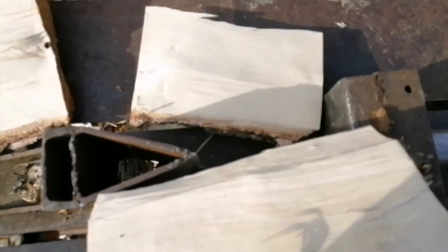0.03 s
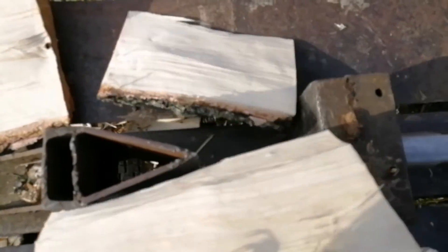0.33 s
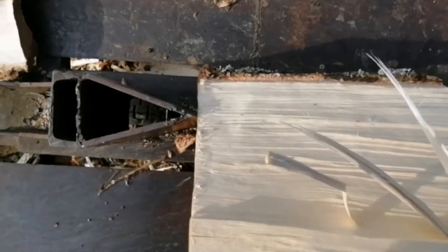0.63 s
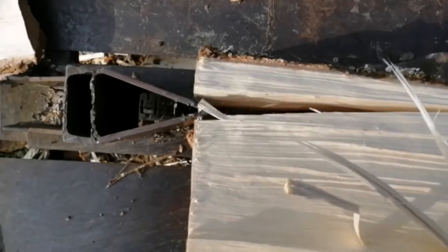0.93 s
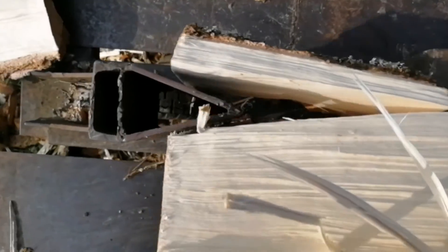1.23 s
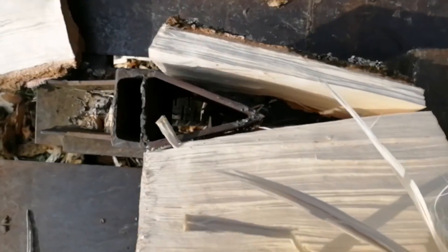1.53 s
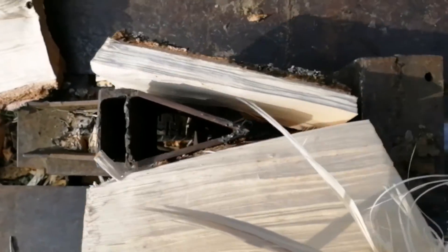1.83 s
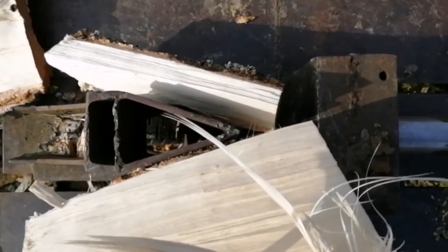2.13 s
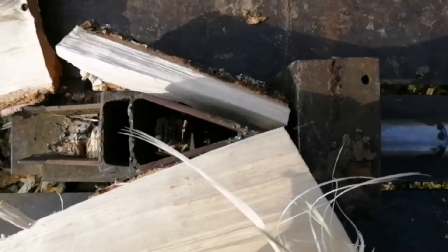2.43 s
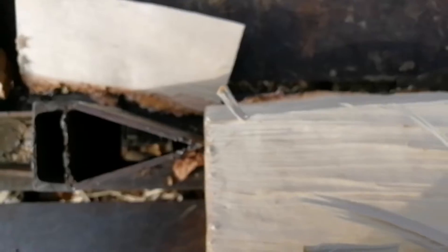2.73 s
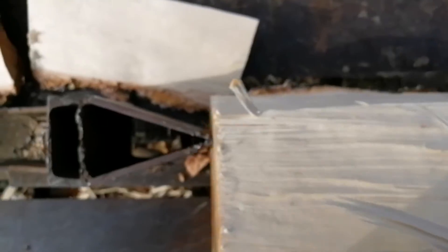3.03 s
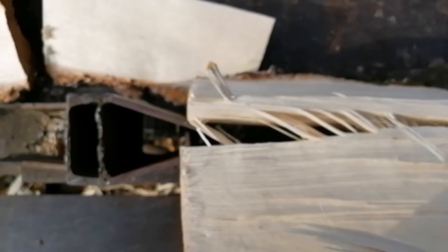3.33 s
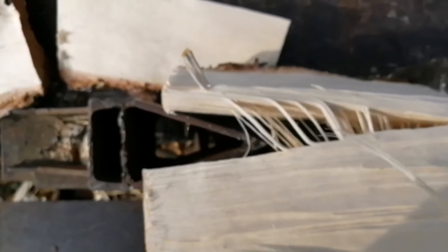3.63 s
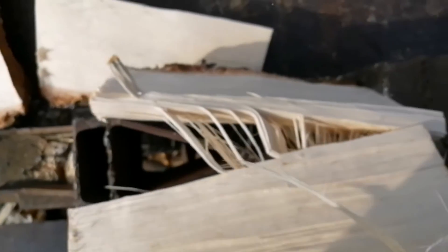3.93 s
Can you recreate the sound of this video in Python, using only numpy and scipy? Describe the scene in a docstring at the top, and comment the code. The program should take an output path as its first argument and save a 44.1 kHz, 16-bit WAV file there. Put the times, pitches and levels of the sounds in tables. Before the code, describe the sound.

Close to the wedge of an outdoor log splitter, a block tears with a rising crackle and cracks. The halves scrape along steel, then another split cracks harder, over a throbbing engine, a humming pump and light wind.

```python
"""Outdoors at a hydraulic log splitter, the microphone just above the wedge. The one-cylinder engine
throbs through its muffler and labours twice as the ram drives a block onto the steel; the pump hums
under the pressure. Close up the wood squeaks, its fibres tear in a rising crackle, and it cracks open.
The halves scrape past, last splinters snap, and light wind buffets the microphone."""
import sys
import numpy as np
from scipy import signal
from scipy.fft import rfft, irfft, next_fast_len
from scipy.io import wavfile
from scipy.ndimage import map_coordinates

SR = 44100
rng = np.random.default_rng(int(sys.argv[2]) if len(sys.argv) > 2 else 0)


def pcm_store(signal):
    """Save signal as 16-bit PCM."""
    levels = np.round(np.clip(np.atleast_2d(signal), -1, 1) * 32767)
    wavfile.write(sys.argv[1], SR, levels.astype(np.int16).T)


N = 176400

# speed of the engine, which also turns the pump: t/s, firing rate/Hz
FIRING_RATE = [(0, 35.2), (.5, 35.2), (.72, 34.8), (.95, 33.1), (1.2, 33.3), (1.38, 35), (1.9, 34.9),
               (2.45, 34.6), (2.7, 33.5), (3, 33.1), (3.18, 32.5), (3.45, 35), (3.75, 35), (4, 34.3)]


def amp(db):
    return 10 ** (np.asarray(db) / 20)


def unit(x):
    return x / np.sqrt(np.mean(x ** 2) + 1e-20)


def curve(rows):
    """(t/s, value) points as one value per sample."""
    return np.interp(np.arange(N) / SR, *np.transpose(rows))


def swells(rows):
    """Summed envelopes, each with attack, hold and release."""
    t = np.arange(N) / SR
    return sum(amp(db) * np.interp(t, np.sort(times), [0, 1, 1, 0]) for *times, db in rows)


def wobble(per_s):
    """A smooth random curve with per_s knots a second."""
    return map_coordinates(rng.standard_normal(1000), [np.arange(N) * per_s / SR], mode="wrap")


def resonance(f, hz, width):
    """Response at f of one mode centred on hz."""
    return 1j * f * width / (hz * hz - f * f + 1j * f * width)


def filtered(x, response):
    """x with its spectrum multiplied by response(f)."""
    size = 2 * next_fast_len((N + SR // 2) // 2)
    return irfft(rfft(x, size) * response(np.fft.rfftfreq(size, 1 / SR)), size)[:N]


def coloured(x, points):
    """x through a causal filter shaped by (f/Hz, level/dB) points, at rms 1."""
    def response(hz):
        f, db = np.transpose(points)
        gain = amp(np.interp(np.log(hz + 1), np.log(f + 1), db))
        cepstrum = irfft(np.log(gain))
        half = len(cepstrum) // 2
        cepstrum[1:half] *= 2  # fold to minimum phase
        cepstrum[half + 1:] = 0
        return np.exp(rfft(cepstrum))
    return unit(filtered(x, response))


def grains(per_s, spread_db):
    """Random tiny slips or snaps of uneven size."""
    sizes = amp(spread_db * np.minimum(rng.exponential(size=N), 4))
    return (rng.random(N) < per_s / SR) * sizes * rng.choice([-1, 1], N)


def burst(envelope, band_hz):
    """Noise under an envelope, kept to a band, with the envelope's energy."""
    bandpass = signal.butter(2, band_hz, "band", fs=SR, output="sos")
    x = signal.sosfilt(bandpass, envelope * rng.standard_normal(len(envelope)))
    return x * np.linalg.norm(envelope) / np.linalg.norm(x)


def steel_frame(x, t60_s=0.044, wet=0.74, width_hz=10):
    """The splitter's frame adds a short dense ring and its main modes; the result is at rms 1."""
    # frame modes: f/Hz, level/dB relative to the direct sound
    modes = [(712, 8), (1195, 0), (1335, -5), (1873, -6), (2643, 0.5), (3290, 3), (4732, -10.5),
             (5168, 2.5), (5760, -8), (5880, -4.5)]
    t = np.arange(SR // 8) / SR
    tail = rng.standard_normal(len(t)) * amp(-60 * t / t60_s)
    x = x + wet * signal.fftconvolve(x, tail / np.linalg.norm(tail))[:N]
    return unit(filtered(x, lambda f: 1 + sum(amp(db) * resonance(f, hz, width_hz) for hz, db in modes)))


def engine():
    """Firings drone through the muffler; gas and clatter swell once a cycle. Load makes it all louder."""
    # how hard the engine works: t/s, level/dB
    effort = [(0.0, -36.5), (0.08, -39.5), (0.17, -49.5), (0.31, -39), (0.41, -34), (0.44, -25.5),
              (0.63, -23), (0.73, -27.5), (0.91, -26.5), (1.05, -40.5), (1.43, -36), (1.63, -37),
              (2.47, -32), (2.55, -33.5), (2.71, -32), (2.74, -22), (3.07, -25.5), (3.29, -47.5),
              (3.34, -35.5), (3.51, -36.5), (3.95, -32), (4.0, -31.5)]
    # colour of the gas leaving the muffler: f/Hz, level/dB
    muffler = [(30, -55), (100, -32), (190, -7), (255, -6), (305, 3), (350, 1), (390, 2), (440, -7.5),
               (530, -11), (680, -36.5), (1500, -50)]
    # colour of the clatter: f/Hz, level/dB
    clatter_colour = [(350, -9), (520, -3.5), (620, -9.5), (711, -10.5), (945, -11.5), (1170, -11.5),
                      (1270, -14.5), (1670, -11.5), (2420, -22), (3810, -28), (5180, -21.5), (6890, -27.5),
                      (7500, -50.5), (9750, -84.5), (16500, -120)]
    # exhaust note: t/s, then level/dB of harmonics 9, 10 and 11, relative to the effort
    harmonics = [(.3, -12, -4, -13), (.47, -14, -1.5, -16), (.68, -13, -1.5, -14), (.82, -11, -7, -6),
                 (1.25, -6, -8, -10), (1.45, -7, -2.5, -12), (1.85, -7, -2.5, -12), (2.05, -4, -10, -8),
                 (2.42, -5, -9, -9), (2.62, -14, -6, -12), (2.76, -3, -15, -14), (3.1, -7, -12, -10),
                 (3.4, -13, -3, -11), (4, -12, -3, -9)]
    cycles, effort_db = np.cumsum(curve(FIRING_RATE)) / SR, curve(effort)
    throb = np.cos(2 * np.pi * cycles)
    gas = coloured(rng.standard_normal(N) * (1 + 0.15 * throb), muffler)
    drone = np.zeros(N)
    for column, order in enumerate((9, 10, 11), 1):
        level = amp(curve(np.array(harmonics)[:, [0, column]]))
        phase = 2 * np.pi * (order * cycles + rng.random()) + 0.26 * wobble(40)
        drone += np.sqrt(2) * level * np.sin(phase)
    clatter = steel_frame(coloured(rng.standard_normal(N) * (1 + 0.21 * throb), clatter_colour))
    clatter_db = -42.5 + 0.64 * (effort_db - np.median(effort_db))  # swings less than the exhaust
    return amp(effort_db) * (amp(-4.2) * gas + drone) + amp(clatter_db) * clatter


def cracks(rise_s=0.0005, snap_t60_s=0.0037):
    """A bundle of fibres breaks: a sharp snap, then a burst that rings the splinter and dies quickly."""
    # breaks: t/s, level/dB of thump, body, ring and top, ring f/Hz, t60/s, snap level/dB
    breaks = [(0.439, -29, -43, -38, -36, 3300, 0.052, -37.5),
              (0.7053, -34, -28.5, -23.5, -21, 2000, 0.034, -33),
              (0.937, -56, -43, -20, -20, 2680, 0.02, -25), (0.9772, -43, -17, -19.5, -14, 870, 0.011, -18),
              (1.09, -36, -25, -25, -33.5, 1340, 0.016, -33),
              (2.7285, -27, -31.5, -39, -36, 2440, 0.04, -33),
              (2.842, -53, -20.5, -22, -41.5, 766, 0.042, -36),
              (2.851, -49, -44, -23, -28, 1980, 0.041, -31),
              (3.096, -27.5, -21.5, -42, -23.5, 2380, 0.033, -26),
              (3.134, -39, -15.5, -21.5, -20, 1863, 0.019, -27),
              (3.153, -42, -13.5, -23, -30.5, 1380, 0.024, -25),
              (3.2281, -51, -31, -37, -28.5, 3150, 0.033, -26),
              (3.245, -14.5, -16, -19, -13.5, 2370, 0.011, -15),
              (3.3129, -60, -36, -41, -46, 3080, 0.011, -35),
              (3.36, -66, -52, -42, -35.5, 2880, 0.018, -44),
              (3.5418, -63.5, -49, -29, -22.5, 2410, 0.015, -17)]
    thump_hz, body_hz, top_hz, snap_hz = (22, 190), (470, 1540), (4930, 6020), (2660, 10800)
    out, t = np.zeros(N + SR), np.arange(SR // 10) / SR
    for start, *levels, ring_hz, t60, snap_db in breaks:
        snap = amp(snap_db) * burst(amp(-60 * t / snap_t60_s), snap_hz)
        envelope = (1 - np.exp(-t / rise_s)) * amp(-60 * t / t60)
        bands = [thump_hz, body_hz, ring_hz * np.exp([-0.079, 0.079]), top_hz]
        wood = sum(amp(db) * burst(envelope, band) for band, db in zip(bands, levels))
        out[round(start * SR):][:len(t)] += snap + wood
    return out[:N]


def tearing():
    """Fibres part in clumps, ever louder up to the split; the finest go first, with a sizzle."""
    # tears: peak t/s, level/dB, rise/(dB/s), fall/(dB/s)
    tears = [(0.944, -31.5, 149, 283), (0.994, -26.5, 293, 275), (2.727, -42.5, 1199, 116),
             (2.852, -30.5, 810, 896), (3.109, -25.5, 97, 151)]
    # colour of the snapping fibres: f/Hz, level/dB
    fibre_colour = [(290, -26), (500, -5), (852, 0), (943, -6), (1170, 0), (1270, -3.5), (1700, -6),
                    (1970, -2.5), (3350, -7), (3890, -12.5), (5160, -4), (5910, -6.5), (7500, -19.5),
                    (9750, -77), (16500, -120)]
    # finest fibres: t/s of start, full, release and end, level/dB, centre f/Hz, width/Hz
    sizzles = [(0.774, .93, 0.96, 1.106, -38.5, 5450, 1000), (2.952, 3.032, 3.08, 3.2, -32.5, 5710, 480)]
    t = np.arange(N) / SR
    level = sum(amp(db - rise * np.maximum(peak - t, 0) - fall * np.maximum(t - peak, 0))
                for peak, db, rise, fall in tears)
    snaps = grains(per_s=2600, spread_db=2.5) * amp(1.5 * wobble(130))
    fine = grains(per_s=4000, spread_db=3.5)
    sizzle = sum(swells([swell]) * unit(filtered(fine, lambda f: resonance(f, hz, width) ** 2))
                 for *swell, hz, width in sizzles)
    return level * coloured(snaps, fibre_colour) + sizzle


def wedge_bite():
    """The wedge rasps into the end grain, which sticks and slips in short squeaks."""
    # steel entering the wood: t/s of start, full, release and end, level/dB
    bites = [(.42, .447, 0.54, 0.82, -37.5)]
    # resonances of the rasp: f/Hz, width/Hz, level/dB
    rasp_modes = [(2090, 110, -8), (2366, 190, -7), (3190, 970, -17.5), (4200, 100, -10.5),
                  (4580, 220, -10), (5340, 630, -7.5)]
    # wood squeaking on the wedge: middle t/s, length/s, f/Hz, level/dB
    squeaks = [(0.47, 0.032, 2430, -43), (0.507, 0.03, 2360, -34), (0.53, 0.076, 2070, -41),
               (0.568, 0.0094, 2470, -34), (0.605, 0.022, 2046, -38.5), (0.659, 0.019, 2070, -35.5),
               (0.674, 0.026, 2390, -46), (1.668, 0.022, 3280, -44)]
    t, slips = np.arange(N) / SR, grains(per_s=2200, spread_db=1.5)
    rasp = sum(amp(db + 5.3 * wobble(35)) * filtered(slips, lambda f: resonance(f, hz, width) ** 2)
               for hz, width, db in rasp_modes)
    out = swells(bites) * unit(rasp)
    for middle, length, hz, db in squeaks:
        envelope = amp(db) * np.exp(-(2 * (t - middle) / length) ** 2)
        roughness = 0.62 * wobble(300)
        out += np.sqrt(2) * envelope * np.sin(2 * np.pi * hz * t + roughness)
    return out


def pump():
    """Pressure ripple, tied to the shaft, hums until the block gives."""
    # pump under pressure: t/s of start, full, release and end, level/dB
    pressure = [(.72, .83, 0.895, 1, -33), (2.8, 2.98, 3.1, 3.16, -31)]
    # ripple harmonics: multiple of the firing rate, relative level/dB
    ripple = [(3, -9), (6, 2), (9, -1.5), (15, -13), (16, -6.5), (20, -9.5)]
    cycles = np.cumsum(curve(FIRING_RATE)) / SR
    hum = sum(amp(db) * np.sin(2 * np.pi * (order * cycles + rng.random()) + 0.073 * wobble(42))
              for order, db in ripple)
    return swells(pressure) * unit(hum)


def scraping():
    """Split faces rasp along the wedge and the bed in short jerks."""
    # wood sliding on steel: t/s of start, full, release and end, level/dB
    scrapes = [(.066, .105, 0.12, 0.18, -32), (.13, .15, 0.2, 0.24, -43), (1.243, 1.252, 1.262, 1.28, -38),
               (1.59, 1.63, 1.64, 1.73, -41), (1.68, 1.72, 1.727, 1.94, -45.5), (1.93, 2, 2.08, 2.25, -50),
               (2.34, 2.36, 2.375, 2.385, -45), (2.405, 2.412, 2.425, 2.435, -45.5),
               (2.458, 2.465, 2.475, 2.485, -43), (2.605, 2.617, 2.628, 2.64, -46),
               (3.435, 3.452, 3.46, 3.49, -38)]
    # colour of the scrape: f/Hz, level/dB
    colour = [(410, -44), (700, -3), (1090, -7), (1210, 3), (1430, -3), (2620, 0), (4180, -6.5), (5090, 4),
              (6090, -0.5), (7500, -11.5), (9750, -46), (16500, -120)]
    slips = grains(per_s=1700, spread_db=1.5) * amp(2.9 * wobble(160))
    return swells(scrapes) * steel_frame(coloured(slips, colour))


def rubbing():
    """The whole block judders along the bed, duller than the scraping edges."""
    # heavy rubs: t/s of start, full, release and end, level/dB
    rubs = [(1.55, 1.64, 1.77, 1.92, -44.5), (1.88, 1.96, 2.11, 2.2, -44.5)]
    # colour of the rub: f/Hz, level/dB
    colour = [(300, -23), (800, -4.5), (1300, 1.5), (2000, -3), (3500, -10.5), (7500, -50.5)]
    return swells(rubs) * steel_frame(coloured(grains(per_s=1600, spread_db=5), colour))


def ticks():
    """Three faint, very bright ticks, each a single sample."""
    # single impulses: t/s, level/dB
    impulses = [(0.4282, -27), (2.717, -32.5), (2.7307, -29.5)]
    out = np.zeros(N)
    for start, db in impulses:
        out[round(start * SR)] = amp(db)
    return out


def wind(flutter_db=2):
    """Light air buffets the microphone."""
    # gusts: t/s, level/dB
    gusts = [(0, -51), (.07, -38.5), (.15, -61), (.33, -57), (.44, -43.5), (.9, -41.5), (1.08, -53.5),
             (1.22, -38.5), (1.6, -42.5), (2.03, -39), (2.12, -31.5), (2.18, -39.5), (2.32, -35),
             (2.4, -42.5), (3.08, -42.5), (3.3, -51.5), (4, -56.5)]
    # colour of the buffeting: f/Hz, level/dB
    rumble = [(20, -17.5), (50, -9.5), (130, -6), (250, -8.5), (600, -18.5), (2000, -70.5)]
    return amp(curve(gusts) + flutter_db * wobble(11)) * coloured(rng.standard_normal(N), rumble)


def scene():
    """Machine, wood and air at one microphone just above the wedge."""
    return (engine() + pump() + tearing() + scraping() + rubbing() + wedge_bite() + cracks() + wind())[None]


def record(dry):
    """The treble is cut steeply; only the faint ticks, added afterwards, reach higher."""
    top_hz, cutoff_hz = 7450, 15700
    narrow = filtered(dry[0], lambda hz: 1 / np.sqrt(1 + (hz / top_hz) ** 120))
    return filtered(narrow + ticks(), lambda hz: hz < cutoff_hz)[None]


dry = scene()
out = record(dry)
pcm_store(out)
```